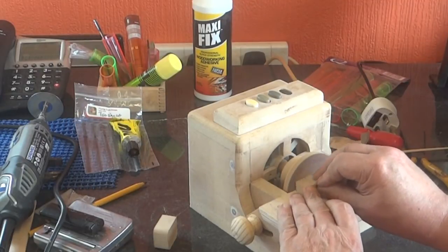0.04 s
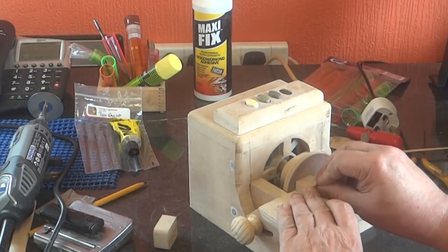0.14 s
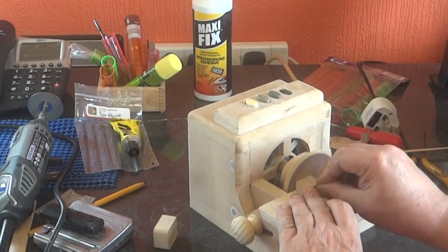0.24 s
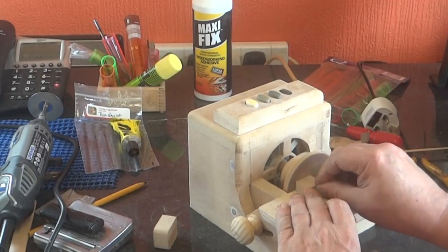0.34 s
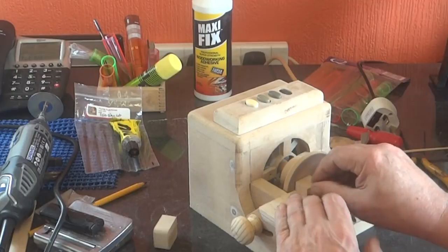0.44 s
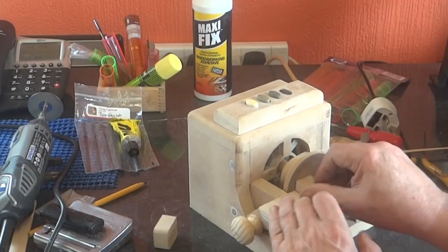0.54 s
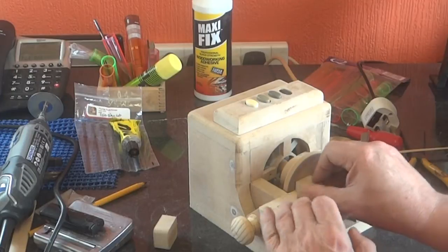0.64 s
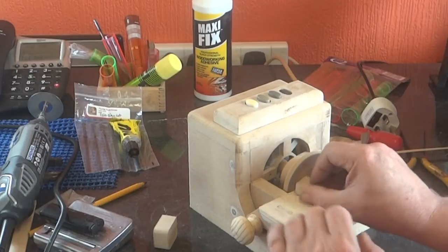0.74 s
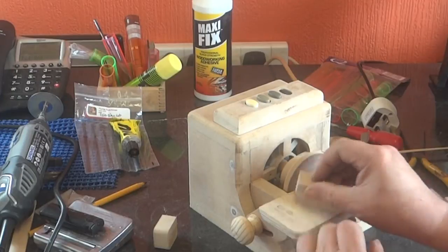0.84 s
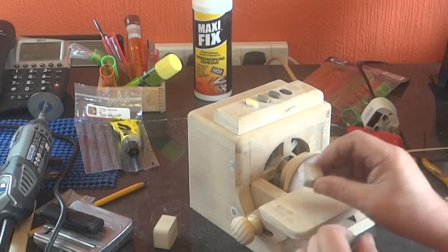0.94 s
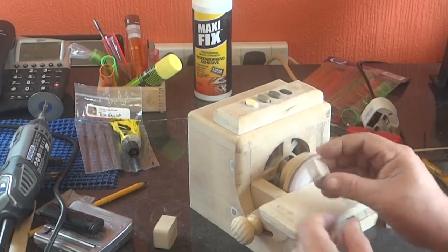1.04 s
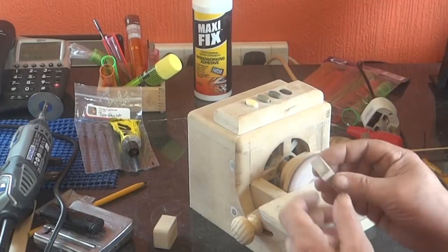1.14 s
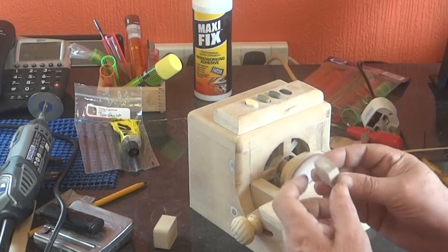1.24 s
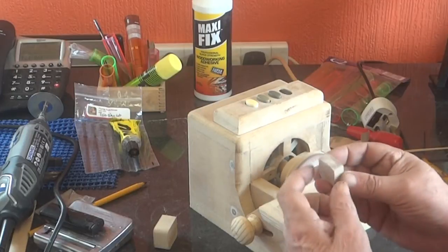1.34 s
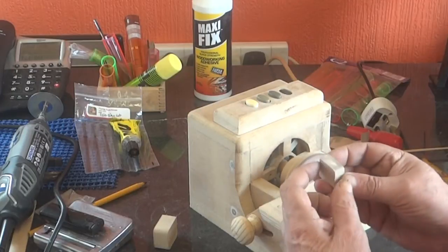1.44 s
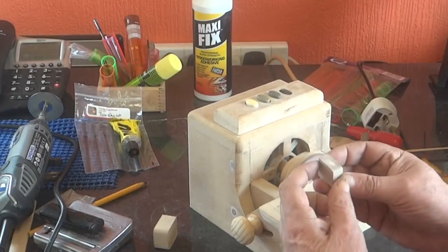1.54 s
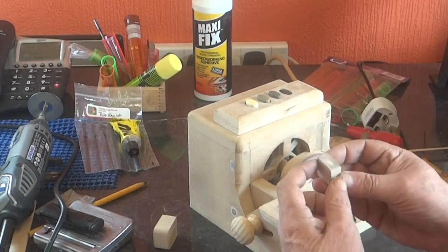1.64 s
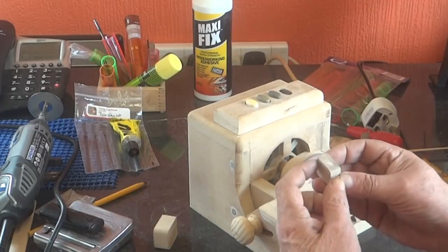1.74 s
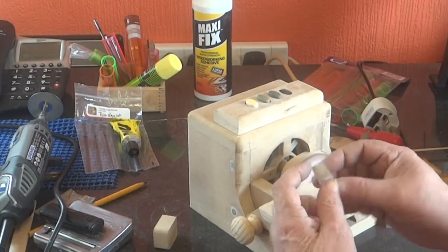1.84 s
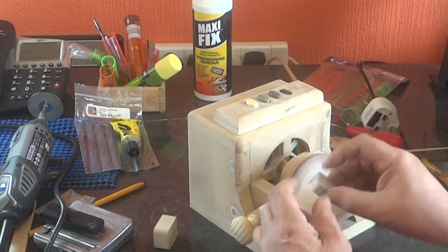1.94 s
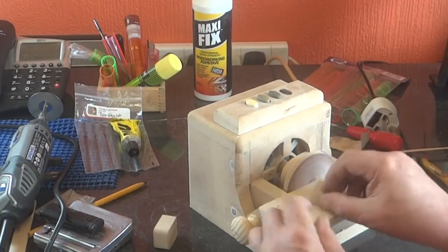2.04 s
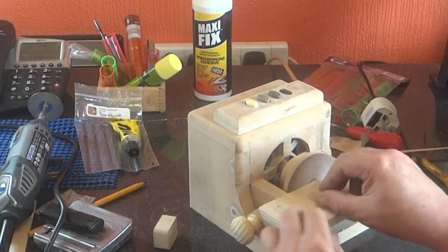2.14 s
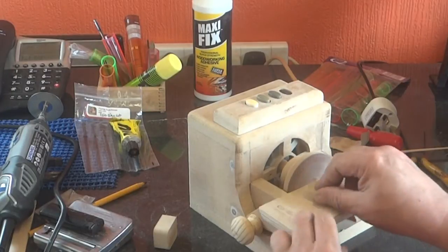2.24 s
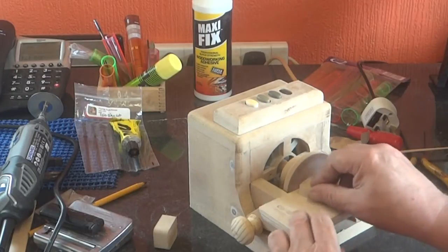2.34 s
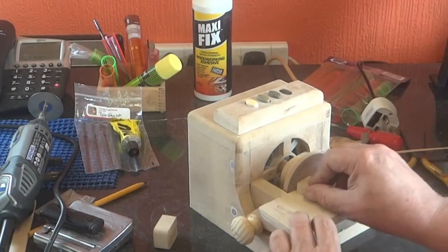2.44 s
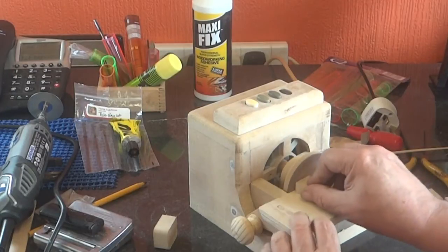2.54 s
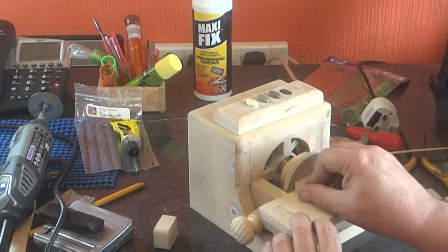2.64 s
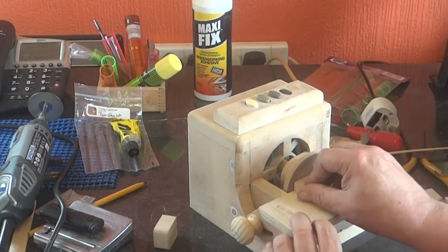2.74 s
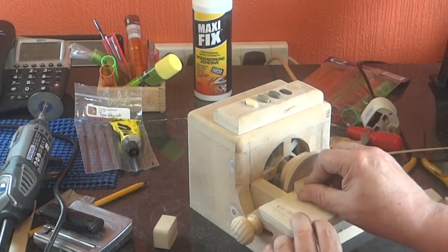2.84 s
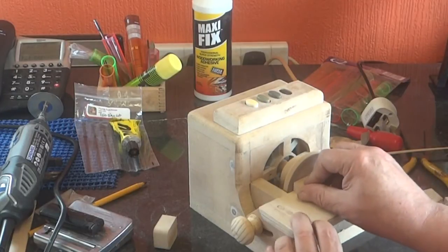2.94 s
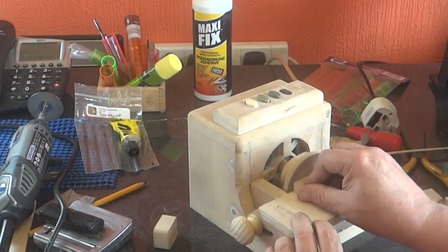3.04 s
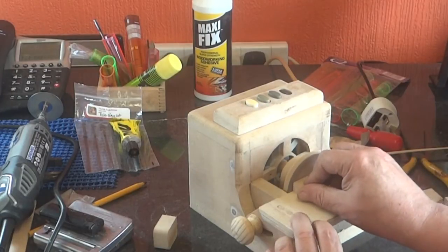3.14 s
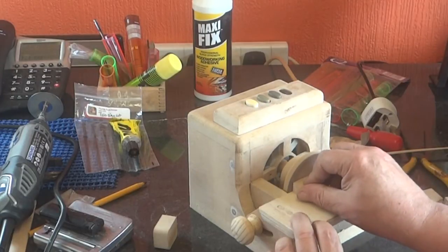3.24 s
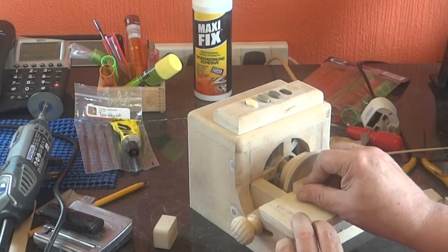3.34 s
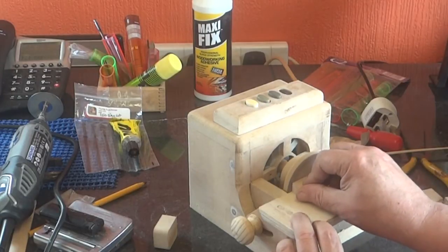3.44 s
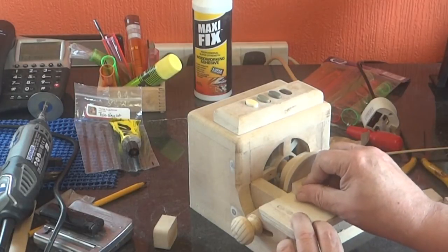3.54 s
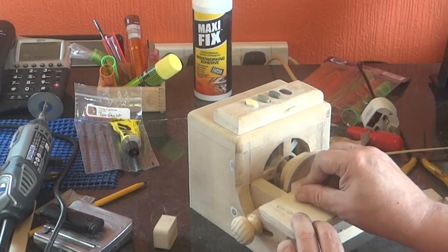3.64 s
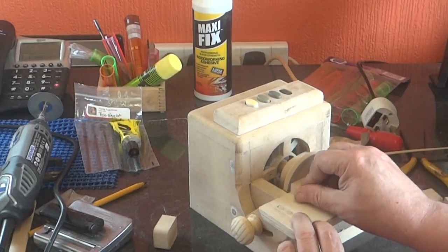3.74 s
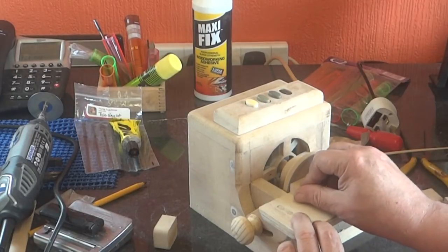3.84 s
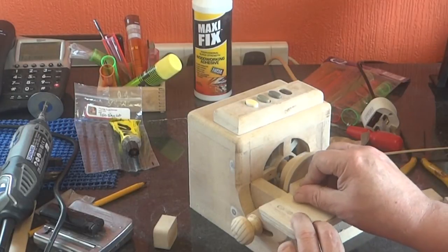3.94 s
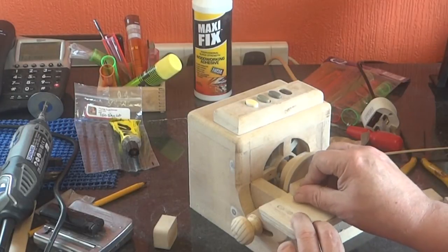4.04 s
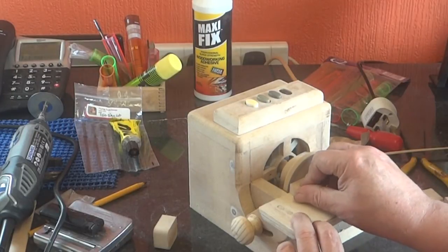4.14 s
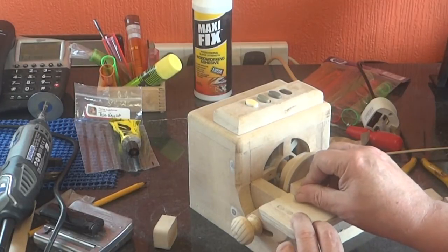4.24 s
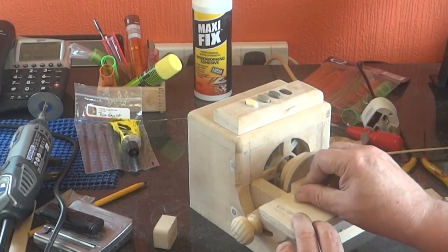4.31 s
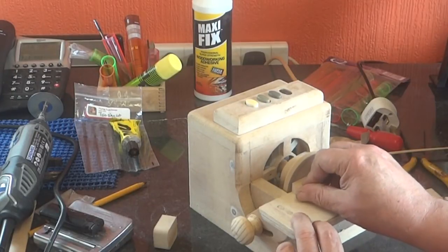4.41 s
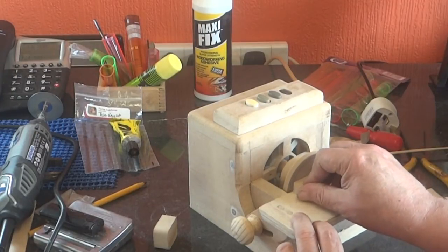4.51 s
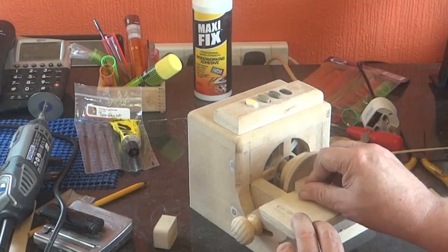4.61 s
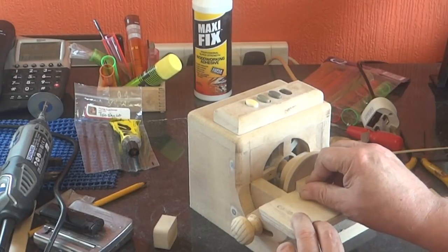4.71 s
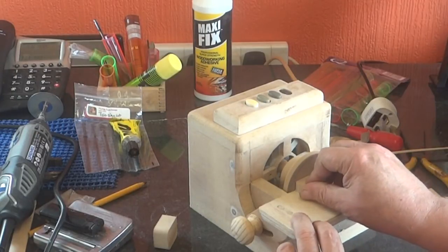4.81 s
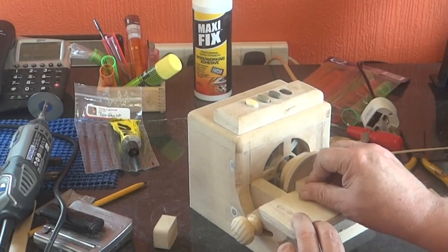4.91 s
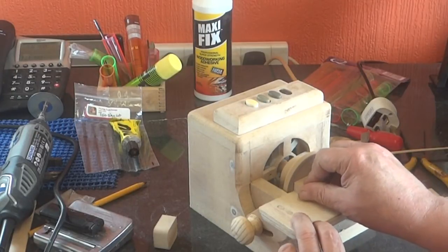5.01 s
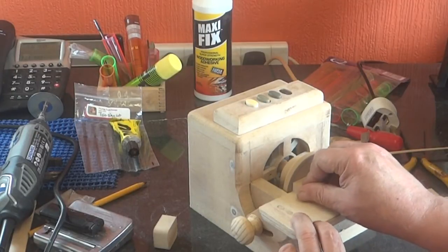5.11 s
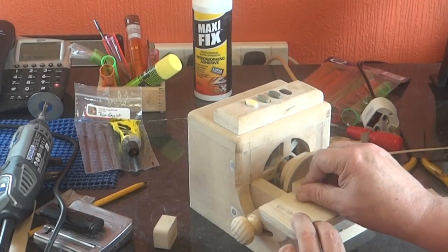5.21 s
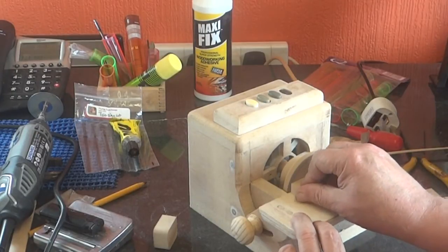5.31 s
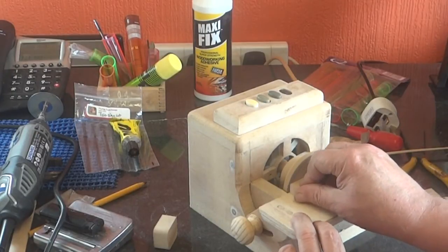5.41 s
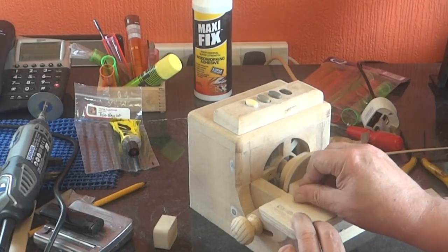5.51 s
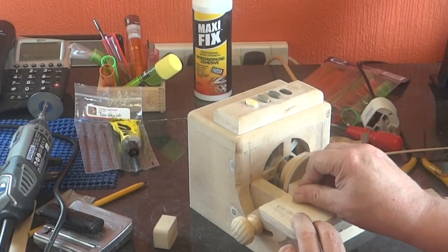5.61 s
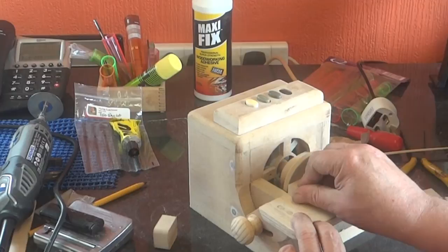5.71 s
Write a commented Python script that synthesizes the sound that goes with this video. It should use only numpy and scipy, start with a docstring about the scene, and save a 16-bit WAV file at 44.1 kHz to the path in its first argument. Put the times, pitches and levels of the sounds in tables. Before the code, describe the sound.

A small electric motor in a wooden case drones low throughout, its disc scuffing rapidly once per turn. Hardwood against sandpaper gives a loud, dry, airy hiss with woody chatter: a short pass, a quick light touch, a gap with faint finger handling, a wooden tap and scrape, then a long pass. Close microphones, narrow stereo, short room reflection.

```python
"""Sanding a hardwood block

A small homemade disc sander runs on a workbench: its motor hums and its wooden case rumbles, both made from
sines and shaped noise that follow the load. The disc scuffs once a turn. Thousands of random grit strikes make
the sanding: the block is pressed on, eased off, touched on briefly, turned in the fingers, set down on the rest,
slid forward and pressed on for a long pass. A small room answers; the microphones are close together."""
import sys
import numpy as np
from scipy import signal
from scipy.fft import rfft, irfft, next_fast_len
from scipy.io import wavfile
from scipy.ndimage import map_coordinates

SR = 44100
rng = np.random.default_rng(int(sys.argv[2]) if len(sys.argv) > 2 else 0)


def waveform_to_disk(signal):
    """Save audio, clipped to [-1, 1], as 16-bit WAV at the path in sys.argv[1]."""
    frames = np.transpose(np.atleast_2d(signal))
    scaled = np.clip(frames, -1, 1) * 32767
    samples = np.round(scaled).astype(np.int16)
    wavfile.write(sys.argv[1], SR, samples)


N = 254456

MAINS_HZ = 50
FREE_TURNS = 24.22  # turns per second without load
MARK_S = 1.2402  # a moment when the disc passes its zero mark


def amp(db):
    """Turn decibels into a gain."""
    return 10 ** (np.asarray(db) / 20)


def unit(x):
    """Scale a sound to rms 1."""
    return x / np.sqrt(np.mean(x ** 2) + 1e-20)


def clock():
    """Give the time of every sample in seconds."""
    return np.arange(N) / SR


def along(points, hz):
    """Read a curve of (frequency, value) points, joined by lines on a log frequency axis."""
    f, v = np.transpose(points)
    return np.interp(np.log(hz + 1), np.log(f + 1), v)


def wobble(rate):
    """Draw a smooth random curve through `rate` random points a second."""
    knots = rng.standard_normal(int(N * rate / SR) + 4)
    return map_coordinates(knots, [clock() * rate])


def filtered(x, response):
    """Multiply the spectrum of x by a response, with spare length so the end does not wrap round."""
    m = next_fast_len(N + SR // 2)
    hz = np.fft.rfftfreq(m, 1 / SR)
    return irfft(rfft(x, m) * response(hz), m)[..., :N]


def lift(hz, modes):
    """Add up the decibels of bell-shaped resonances."""
    return sum(db / (1 + (2 * (hz - centre) / width) ** 2) for centre, width, db in modes)


def body(hz, spectrum, modes):
    """Gain of a broad spectrum with resonances standing on it."""
    return amp(along(spectrum, hz) + lift(hz, modes))


def band(hz, centre, width):
    """One resonance that rings only after it is struck."""
    return 1j * hz * width / (centre ** 2 - hz ** 2 + 1j * hz * width)


def above(hz, edge_hz, order=8):
    """Share of each frequency that lies above a soft edge."""
    return hz ** order / (hz ** order + edge_hz ** order)


def noise(response):
    """Coloured noise of rms 1."""
    return unit(filtered(rng.standard_normal(N), response))


def slip_beat(turns):
    """Phase by which the four-pole rotor falls behind its magnetic field: slow when free, fast under load."""
    return 2 * np.pi * (2 * MAINS_HZ * clock() - 4 * turns)


def stroke(start, end, attack, release):
    """One hand movement: a gain that rises on landing, and a fall in dB that gathers speed on leaving."""
    t = clock()
    landing = 1 - np.exp(-np.maximum(t - start, 0) / attack)
    leaving_db = -10 * (np.maximum(t - end, 0) / release) ** 1.7  # 10 dB down after one release time
    return landing, leaving_db


# Magnetic hum: (multiple of the mains frequency, free-running level [dB], fully loaded level [dB])
HUM_TONES = [(2, -56, -53), (4, -59.5, -70), (6, -48.5, -58.5), (8, -61.5, -66), (10, -70, -69.5),
             (16, -74.5, -97)]


def motor(load, turns, waver_db=0.8, throb_db=0.8, throb_drift=.2):
    """Mains hum whose overtones shift with load; the slipping rotor makes it throb."""
    t, hum = clock(), np.zeros(N)
    for multiple, free_db, loaded_db in HUM_TONES:
        phase = 2 * np.pi * (round(multiple) * MAINS_HZ * t + rng.random())
        level_db = free_db + (loaded_db - free_db) * load + waver_db * wobble(5.23)
        hum += amp(level_db) * np.sin(phase)
    depth_db = throb_db * load * (-1.0 + throb_drift * wobble(2.5))
    return np.sqrt(2) * hum * amp(depth_db * np.cos(slip_beat(turns)))


# Colour of the wooden case's rumble: (frequency [Hz], relative level [dB per Hz])
CASE_RUMBLE = [(20, -22), (70, -13), (110, -10.5), (165, -6.5), (225, -13), (270, -6.5), (350, 3),
               (430, -10), (600, -15), (900, -60), (2000, -70)]


def rumble(load, free_db=-55, loaded_db=-53):
    """The wooden case rumbles as low noise, a little louder under load."""
    level_db = free_db + (loaded_db - free_db) * load
    return noise(lambda hz: amp(along(CASE_RUMBLE, hz))) * amp(level_db)


# Colour of the shaft and fan running free: (frequency [Hz], relative level [dB per Hz])
SHAFT_WHIRR = [(600, 0.5), (1100, -9), (2000, -9), (3500, -10.5), (4300, -3), (5200, -6), (6100, -14),
               (7500, -7), (8600, -14.5), (10000, -19.5), (15500, -29)]
# Resonances of the motor frame: (frequency [Hz], width [Hz], lift [dB])
MOTOR_FRAME = [(819, 19, 9), (1288, 61, 11.5), (1590, 240, 7.5), (2220, 32, 10), (2530, 125, 10),
               (2990, 36, 11.5), (3096, 90, 12), (4020, 97, 7.5), (7100, 93, 10)]
# Quick run of rubs in each turn's scuff:
# (time after the turn's mark at free speed [s], length [s], centre [Hz], width [Hz], level before the swell [dB])
SCUFF_RUBS = [(-.0027, 0.00072, 11500, 2000, -63.5), (.0002, 0.0014, 7100, 2000, -52.5),
              (.0012, 0.0017, 4300, 1500, -50.5), (.0045, 0.0017, 2380, 716, -53.5)]


def shaft(turns, whirr_db=-57.0, fresh_db=0, swell_db=2.5, swell_phase=0.67):
    """A rough track repeats each turn, mixed with fresh noise: a whirr in the frame plus a short scuff."""
    track = rng.standard_normal(round(SR / FREE_TURNS))
    place = (turns % 1 * len(track)).astype(int) % len(track)
    rough = track[place] + amp(fresh_db) * rng.standard_normal(N)
    rub = unit(filtered(rough, lambda hz: body(hz, SHAFT_WHIRR, MOTOR_FRAME) * above(hz, 506)))
    # the magnetic pull swells and eases
    strength = amp(swell_db * np.cos(slip_beat(turns) - swell_phase))
    out = amp(whirr_db) * rub
    for delay, length, centre, width, db in SCUFF_RUBS:
        since = ((turns - delay * FREE_TURNS + .5) % 1 - .5) / FREE_TURNS
        pulse = np.exp(-.5 * (since / length) ** 2)
        scuff = unit(filtered(rub, lambda hz: band(hz, centre, 2 * width) ** 2))
        out += amp(db) * strength * pulse * scuff
    return out


# The block tips from its edge onto a face:
# (time [s], brief hiss change just before [dB], chatter change once settled [dB], fizz change once flat [dB])
BLOCK_TIPS = [(0.21, -8.5, -14, 3.5), (0.824, -1, 0, 1), (2.755, 1.2, -1.1, 7)]


def tipping(start, end, tip_s=0.013, lead_s=.028, dip_s=0.025, settle_s=0.23, rocking_chatter=.3):
    """Rocking over briefly changes the block's bite; lying on a new face changes its chatter and fizz."""
    t, change = clock(), np.zeros((3, N))  # rows: hiss, chatter, fizz in dB
    for s, dip_db, chatter_db, fizz_db in BLOCK_TIPS:
        if start < s < end:
            dip = dip_db * np.exp(-.5 * ((t - s + lead_s) / dip_s) ** 2)
            flat = .5 + .5 * np.tanh((t - s) / tip_s)
            settled = 1 - np.exp(-np.maximum(t - s + lead_s, 0) / settle_s)
            change += [dip, chatter_db * settled - rocking_chatter * dip, dip / 2 + fizz_db * flat]
    return change


# The block meets the disc: (start [s], end [s], attack [s], release [s], hiss against the hand's pressure [dB],
# chatter against hiss [dB], fizz of the finest grit against hiss [dB], name of the grip)
DISC_PASSES = [(-.05, 0.369, .005, 0.13, 0, -8, -5.5, "first"),
               (0.672, 0.677, .002, 0.0093, -16, -24, -16, "touch"),
               (0.714, 0.833, .03, .008, 1, -13.5, -12, "touch"),
               (2.554, 5.8, .006, .02, 0, -11, -9.5, "last")]
# How hard the hand presses: (time [s], hiss level before each pass's own changes [dB])
HAND_PRESSURE = [(0.051, -21), (0.33, -25), (2.59, -24.5), (2.67, -28.0), (2.82, -25.0), (3.08, -24.5),
                 (3.9, -27.5), (4.02, -29.5), (4.1, -26.5), (4.28, -28), (4.55, -25), (4.9, -27),
                 (5.201, -25), (5.5, -27.0), (5.75, -27.5)]


def contact(usual_db=-25.5, chatter_grows=.35, chatter_fades=0.68, chatter_wander_db=.45,
            fizz_fades=1.9, chatter_builds=1.6, light_touch=1.8):
    """Each pass's hiss, chatter and fizz gains and firmness 0-1; chatter answers pressure least."""
    lean_db = np.interp(clock(), *np.transpose(HAND_PRESSURE)) - usual_db
    passes = []
    for start, end, attack, release, db, chatter_db, fizz_db, grip in DISC_PASSES:
        landing, leaving_db = stroke(start, end, attack, release)
        hiss_change = lean_db + leaving_db
        # the block never sits quite still on the rest
        chatter_change = chatter_db + chatter_grows * lean_db + chatter_fades * leaving_db
        chatter_change = chatter_change + chatter_wander_db * wobble(7)
        fizz_change = fizz_db + lean_db + fizz_fades * leaving_db
        levels = np.array([hiss_change, chatter_change, fizz_change])
        hiss, chatter, fizz = amp(usual_db + db + levels + tipping(start, end))
        firm = landing * amp(light_touch * leaving_db)  # contact turns loose as the hand lets go
        # chatter is slow to build on landing
        passes.append([landing * hiss, landing ** chatter_builds * chatter, landing * fizz, firm])
    return np.array(passes)


# Colour of grit cutting wood: (frequency [Hz], relative level [dB per Hz])
GRIT_COLOUR = [(420, -24), (700, -23), (950, -21.5), (1100, -19), (2000, -22.5), (3300, -7.5), (4500, -7.5),
               (7500, 0.0), (9000, -1.5), (10500, -7), (13000, -10), (15500, -18.5)]
# Resonances of the wood: (frequency [Hz], width [Hz], lift [dB])
WOOD_MODES = [(507, 12, 4.4), (613, 28, 5), (778, 30, 5.7), (1068, 82, 11.4), (1177, 43, 8.7),
              (1314, 150, 7.2), (1396, 85, 7.1), (1562, 55, 6.7), (1631, 74, 15.2), (1881, 140, 13),
              (2223, 355, 9.15), (2507, 110, 7.3), (2706, 27, 10.7), (2904, 123, 8.5), (4007, 82, 5.6),
              (4270, 480, 3.4), (4760, 40, 4.4), (5110, 145, 2.9), (5527, 45, 6.8), (5540, 49, 3.2),
              (9000, 55, 2.8)]
# Each grip and edge of the block colours its pass: grip name: (frequency [Hz], width [Hz], lift [dB])
GRIP_COLOURS = {"first": [(333, 46, 15), (550, 210, -7.5), (2140, 520, 0.5), (4600, 970, -1),
                (6150, 84, 9.5), (8230, 130, 0), (10000, 1100, 2.5), (13400, 3300, -7.5)],
                "touch": [(1370, 660, 6.5), (2620, 410, -7), (3200, 110, 11), (4230, 400, 5.5),
                (5040, 82, 9), (6800, 200, 4), (8200, 1200, -3.5), (11000, 1200, 4)],
                "last": [(5050, 61, 6), (6050, 40, 3), (7100, 100, 3), (7900, 50, 0), (8560, 75, 5)]}


def split_bands(hz):
    """Share the cutting sound out into hiss (middle), chatter (low) and fizz (high)."""
    return np.array([above(hz, 3350) - above(hz, 8740), 1 - above(hz, 2965), above(hz, 10000)])


def sanding(passes, turns, grains_per_s=90000, light_sway_db=5, firm_sway_db=0.3, high_spot=0.68,
            flutter_db=0.54):
    """Thousands of grit points strike the wood; the disc's high spot bites once a turn, most when light."""
    strikes = np.sqrt(rng.poisson(grains_per_s / SR, N)) * rng.standard_normal(N)
    cut = filtered(strikes, lambda hz: body(hz, GRIT_COLOUR, WOOD_MODES) * above(hz, 226))
    bands = {}
    for grip, modes in GRIP_COLOURS.items():
        bands[grip] = filtered(cut, lambda hz: amp(lift(hz, modes)) * split_bands(hz))
    bite = np.cos(2 * np.pi * (turns - high_spot))
    out = np.zeros(N)
    for (*gains, firm), (*_, grip) in zip(passes, DISC_PASSES):
        sway = amp((light_sway_db * (1 - firm) + firm_sway_db * firm) * bite)
        for trim_db, gain, part in zip((-1.5, -1, -2), gains, bands[grip]):
            out += sway * amp(trim_db) * gain * unit(part)
    return out * amp(flutter_db * wobble(70))


# How long the room rings: (frequency [Hz], time to fall 60 dB [s])
ROOM_DECAY = [(200, 1), (1500, 0.21), (4200, 0.32), (8000, 0.35), (15000, 0.18)]


def room(x):
    """A diffuse answer, 4 ms late, in which each frequency dies at its own speed."""
    hz, t, z = signal.stft(rng.standard_normal(SR // 2), SR, nperseg=256)
    fading = z * amp(-60 * t / along(ROOM_DECAY, hz)[:, None])
    tail = signal.istft(fading, SR, nperseg=256)[1]
    answer = np.pad(tail, (SR // 250, 0)) / np.linalg.norm(tail)
    return signal.fftconvolve(x, answer)[:N]


# Knocks of the block: (time [s], level [dB], centre [Hz], width [Hz], time to fall 60 dB [s])
BLOCK_KNOCKS = [(0.823, -22, 5400, 2100, 0.13), (1.052, -48, 1370, 153, 0.14),
                (1.064, -45, 1560, 200, 0.057), (2.108, -44, 1290, 500, 0.085),
                (2.143, -22.5, 2540, 2980, 0.042), (2.147, -37, 1260, 300, 0.07)]


def handling(soft_hz=6000):
    """Short dying bursts: the block catches the disc, shifts in the fingers and taps down on the rest."""
    t, out = clock(), np.zeros(N)
    # the wood's resonances at half their lift
    wood = noise(lambda hz: amp(lift(hz, WOOD_MODES) / 2) * above(hz, 1180) * (1 - above(hz, soft_hz)))
    for s, db, centre, width, t60 in BLOCK_KNOCKS:
        age = np.maximum(t - s, 0)
        envelope = amp(db - 60 * age / t60) * (1 - np.exp(-age / 0.0014))
        out += envelope * unit(filtered(wood, lambda hz: band(hz, centre, 2 * width) ** 2))
    return out


# Colour of the block rubbing: (frequency [Hz], relative level [dB per Hz])
RUB_COLOUR = [(600, -4), (1000, -8), (1300, -1), (1700, -14), (2200, -2), (2950, -1), (3400, -5),
              (6000, -9.5), (12000, -27)]
# The block rubs on fingers or rest: (start [s], end [s], attack [s], release [s], scrape level [dB],
# ring level [dB], ring pitch at the start [Hz], glide of the ring [Hz per s])
BLOCK_RUBS = [(1.2, 1.55, .06, 0.12, -78, -64, 1400, 350),
              (2.135, 2.178, 0.0099, 0.055, -43, -54, 1193, -500),
              (2.24, 2.58, 0.047, 0.014, -47.5, -55, 3200, -1400),
              (2.553, 2.613, .006, 0.017, -53, -42, 1370, -500)]


def rubbing(ring_width_hz=110):
    """The block turns in the fingers, scrapes as it lands and slides; each rub has a narrow gliding ring."""
    t, out = clock(), np.zeros(N)
    scrape = noise(lambda hz: body(hz, RUB_COLOUR, WOOD_MODES))
    waver = noise(lambda hz: 1 - above(hz, ring_width_hz, order=4))
    for start, end, attack, release, db, ring_db, ring_hz, glide in BLOCK_RUBS:
        landing, leaving_db = stroke(start, end, attack, release)
        pitch = ring_hz + glide * (np.clip(t, start, end) - start)
        ring = np.sqrt(2) * waver * np.sin(2 * np.pi * np.cumsum(pitch) / SR)
        out += landing * amp(leaving_db) * (amp(db) * scrape + amp(ring_db) * ring)
    return out


# How much the diffuse room sound differs between left and right: (frequency [Hz], level [dB])
STEREO_WIDTH = [(100, -18), (700, -7), (1300, -10), (2400, -17), (8000, -10), (15000, -26)]


def scene(full_load_db=-28, slip=1.7, unsteady=.12, lag_s=.025, room_db=-8.0, sanding_side_db=-4,
          rumble_side_db=-13):
    """Pressing loads the motor and slows the disc; room sound and some case rumble differ left to right."""
    passes = contact()
    pressure = np.clip(passes[:, 0].sum(axis=0) / amp(full_load_db), 0, 1)
    follow = np.exp(-1 / (lag_s * SR))  # the rotor's inertia
    load = signal.lfilter([1 - follow], [1, -follow], pressure, zi=pressure[:1])[0]
    # slip is in turns per second at full load; the hand never presses quite evenly
    speed = FREE_TURNS - slip * load * (1 + unsteady * wobble(4))
    turns = np.cumsum(speed) / SR
    turns -= turns[round(MARK_S * SR)]
    hiss = sanding(passes, turns)
    small_sounds = shaft(turns) + handling() + rubbing()
    work = hiss + small_sounds
    mid = work + amp(room_db) * room(work) + motor(load, turns) + rumble(load)
    diffuse = room(amp(sanding_side_db) * hiss + small_sounds)
    side = filtered(diffuse, lambda hz: amp(along(STEREO_WIDTH, hz)))
    side += amp(rumble_side_db) * rumble(load)
    return np.array([mid + side, mid - side])


def record(dry, top_hz=15900):
    """Cut the treble steeply above the top frequency."""
    return filtered(dry, lambda hz: .5 - .5 * np.tanh((hz - top_hz) / 80))


dry = scene()
out = record(dry)
waveform_to_disk(out)
```